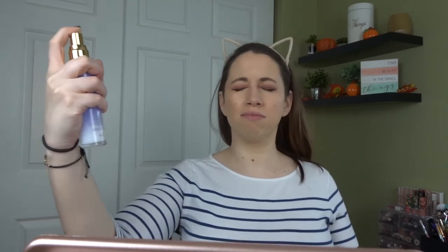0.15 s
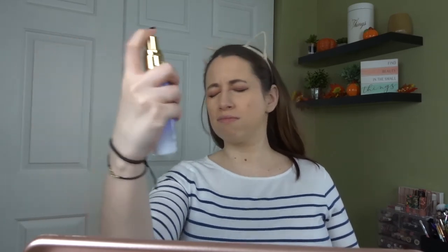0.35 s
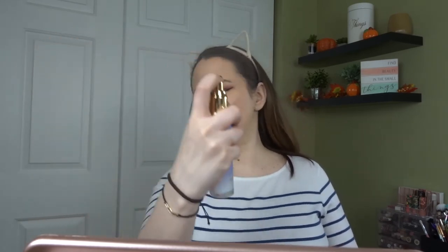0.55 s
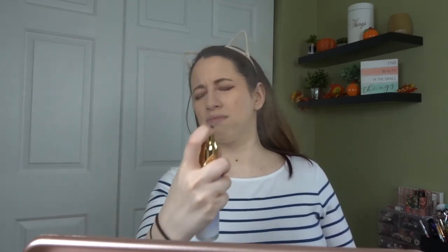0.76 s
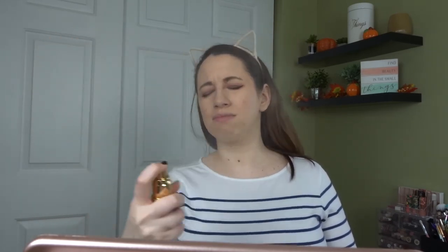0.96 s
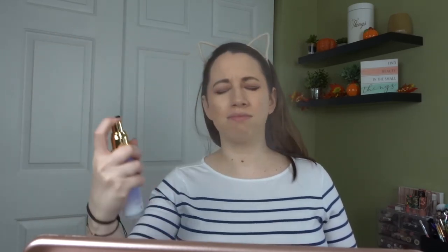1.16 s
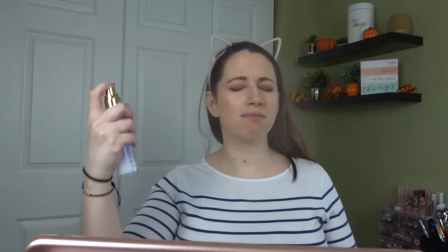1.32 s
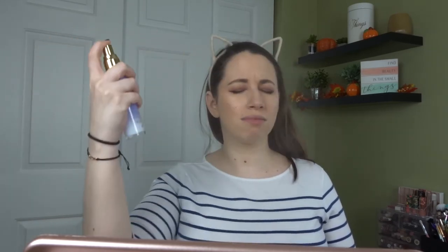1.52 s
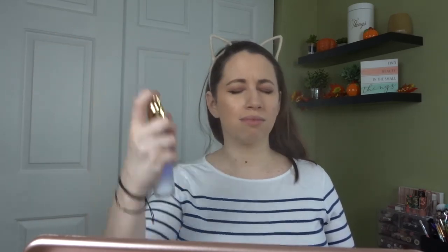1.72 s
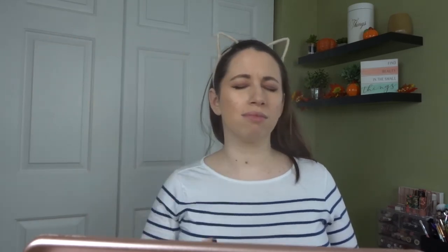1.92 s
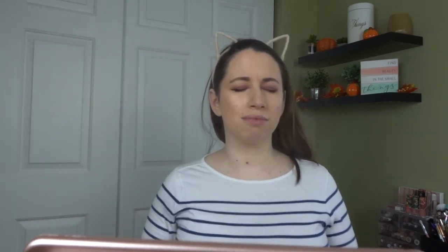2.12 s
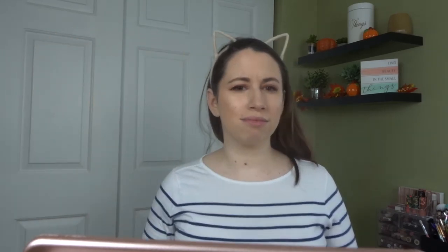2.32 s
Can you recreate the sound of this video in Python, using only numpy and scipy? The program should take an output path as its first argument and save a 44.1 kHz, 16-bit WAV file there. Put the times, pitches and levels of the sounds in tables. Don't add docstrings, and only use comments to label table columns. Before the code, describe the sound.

Hand pump spray bottle pressed repeatedly, short misty hisses with sharp plastic clacks, quiet room

```python
import sys
import numpy as np
from scipy import signal
from scipy.fft import rfft, irfft, next_fast_len
from scipy.io import wavfile
from scipy.ndimage import uniform_filter1d

SR = 44100
rng = np.random.default_rng(int(sys.argv[2]) if len(sys.argv) > 2 else 0)


def boost(x):
    u = np.asarray(x, float) / 20
    return 10 ** u


def digitize_waveform(pressure):
    field = np.atleast_2d(pressure).T
    bounded = np.clip(field, -1, 1)
    quanta = np.round(bounded * 32767).astype(np.int16)
    wavfile.write(sys.argv[1], SR, quanta)


N = 104958
PRE = 4410
LEFT_RIGHT = np.array([[1], [-1]])


def colour(x, points):
    p, n = np.array(points, float), next_fast_len(x.shape[-1])
    f_hz = np.arange(n // 2 + 1) * SR / n + 1
    gain_db = np.interp(np.log(f_hz), np.log(p[:, 0]), p[:, 1], left=p[0, 1] - 15)
    y = irfft(rfft(x, n) * boost(gain_db), n)[..., :x.shape[-1]]
    return y / np.sqrt(np.mean(y ** 2))


def high(x, hz, order=2):
    return signal.sosfilt(signal.butter(order, hz, "high", fs=SR, output="sos"), x)


def walk(rate_hz, n):
    k = int(SR / rate_hz)
    held = np.repeat(rng.standard_normal(n // k + 1), k)
    w = uniform_filter1d(uniform_filter1d(held, k), k)[:n]
    return w / w.std()


def ring(modes, t, phases):
    s = np.maximum(t, 0)
    total = 0
    for (hz, db, t60_s), phase in zip(modes, phases):
        total = total + boost(db - 60 * s / t60_s) * np.sin(2 * np.pi * hz * s + phase)
    return total * (t > 0)


PRESS_STARTS = [
    -.06,
    .2195,
    .462,
    .7038,
    .944,
    1.2112,
    1.6538,
]
# length_s, start_db, stop_db, fine_mist_db
PRESSES = [
    (0.03, -28.5, -54, 0.5),
    (0.031, -43, -35, 0.5),
    (0.034, -37.5, -35.5, -0.5),
    (0.067, -39, -36.5, -0.5),
    (0.068, -42, -38.5, 1),
    (0.054, -41, -39, -0.5),
    (0.035, -47, -40, 1),
]
# freq_hz, level_db
MIST_SPECTRUM = [(900, -19.5), (1600, -18), (2200, -6), (4000, -5.5), (5200, -7), (6300, -7), (8000, -10),
                 (10300, -13)]
MIST_ATTACK_S, MIST_RELEASE_T60_S = 0.00021, 0.12
DROPS_DB, SPUTTER_DB, FINE_HZ = 2.0, 1.5, 3500


def mist(t):
    n, press, fine = len(t), 0, 0
    for start_s, (length_s, start_db, stop_db, fine_db) in zip(PRESS_STARTS, PRESSES):
        end_s = start_s + length_s
        level_db = np.interp(t, [start_s, end_s], [start_db, stop_db])
        level_db = level_db - 60 * np.maximum(t - end_s, 0) / MIST_RELEASE_T60_S
        flow = boost(level_db) * np.clip((t - start_s) / MIST_ATTACK_S, 0, 1)
        press = press + flow
        fine = fine + flow * (boost(fine_db) - 1)
    droplets_db = DROPS_DB * rng.exponential(size=n) + SPUTTER_DB * walk(150, n)
    hiss = colour(rng.standard_normal((2, n)) * boost(droplets_db), MIST_SPECTRUM)
    return press * hiss + fine * high(hiss, FINE_HZ, order=1)


# time_s, peak_db, bright_db_per_octave
STOPS = [
    (-.012, -15, 2),
    (0.2507, -14.5, -1.5),
    (0.4945, -11, 2),
    (0.7647, -9, 3),
    (1.0053, -7, 5.5),
    (1.2548, -13.5, 6),
    (1.6924, -15, 0.5),
]
# freq_hz, level_db, t60_s
CLACK_MODES = [(2930, -0.5, 0.0027), (3910, -0.5, 0.0037), (4930, -12, 0.0016), (6800, -2, 0.0023),
               (7700, -14, 0.0015), (9140, -10, 0.0025)]
CLACK_SCATTER, TICK_SCATTER = 0.025, 0.025
SMALL_HZ = 1957


def plunger_clacks(t):
    out = np.zeros(len(t))
    for (time_s, peak_db, bright), c in zip(STOPS, rng.standard_normal((len(STOPS), 12))):
        first = int(time_s * SR) + PRE
        k = slice(first, first + 2000)
        modes = [(hz * (1 + CLACK_SCATTER * j), db + bright * np.log2(hz / 4000), t60_s)
                 for (hz, db, t60_s), j in zip(CLACK_MODES, c)]
        x = ring(modes, t[k] - time_s, 0.25 * c[6:])
        out[k] -= boost(peak_db) * x / np.abs(x).max()
    return high(out, SMALL_HZ, order=4)


# freq_hz, level_db
ROOM_COLOUR = [(1500, -0.5), (2300, -2.5), (3300, -5), (5500, -2), (6400, 5), (7400, -3.5), (8800, 0.5),
               (10500, -3)]
ROOM_DB, ROOM_LAG_S, ROOM_T60_LOW_S, ROOM_T60_HIGH_S = -1.5, 0.003, 0.42, 0.38
SAME_LOW, SAME_HIGH = 0.56, 0.037
LATE_DB, LATE_T60_S, LATE_TOP_HZ = -13.5, 1.31, 3130


def room(x):
    u = np.arange(SR) / SR
    noise = rng.standard_normal((3, len(u)))

    def mix(same):
        return np.sqrt(1 - same) * noise[:2] + np.sqrt(same) * noise[2]

    wash = mix(SAME_LOW) + high(mix(SAME_HIGH) - mix(SAME_LOW), 2500)
    top = high(wash, 2760)
    early = (wash - top) * boost(-2.0 - 60 * u / ROOM_T60_LOW_S) + top * boost(-60 * u / ROOM_T60_HIGH_S)
    dull = wash - high(wash, LATE_TOP_HZ, order=1)
    late = dull * boost(LATE_DB - 60 * u / LATE_T60_S)
    response = colour((early + late) * (u > ROOM_LAG_S), ROOM_COLOUR) / np.sqrt(len(u))
    return signal.fftconvolve(x[None], response, axes=1)[:, :len(x)] * boost(ROOM_DB)


# freq_hz, level_db
HUSH_SPECTRUM = [(25, -23), (60, -8.5), (200, -6.5), (700, -6), (1000, -7), (1300, -13), (2000, -10.5),
                 (10500, -26.5)]
# freq_hz, width_hz, level_db
HOLLOWS = [(428, 225, -12.5), (643, 112, -10)]
# time_s, level_db
HUSH_LEVEL = [(0, 1), (.8, 2.5), (1.5, 0), (2.0, 1.5), (2.38, -2)]
HUSH_DB = -63


def hush(t):
    n = len(t)
    pair = colour(rng.standard_normal((2, n)), HUSH_SPECTRUM)
    for hz, width_hz, db in HOLLOWS:
        peak = [(hz - width_hz, -20), (hz, 0), (hz + width_hz, -20), (2 * hz, -60)]
        tone = colour(rng.standard_normal((2, n)), peak)
        pair = pair + boost(db + 3.5 * walk(8.18, n)) * tone
    side = high(pair[1], 380, order=2) * boost(-5.0) + boost(-7) * pair[1]
    level_db = HUSH_DB + np.interp(t, *np.array(HUSH_LEVEL).T) + 0.5 * walk(5.81, n)
    return boost(level_db + 0.3 * LEFT_RIGHT) * (pair[0] + side * LEFT_RIGHT)


FAN_HZ, FAN_DB = 111.3, -75


def fan(t):
    n = len(t)
    pitch_hz = FAN_HZ * (1 + 0.0304 * walk(23.0, n))
    return boost(FAN_DB + 1.2 * walk(9.6, n)) * np.sin(2 * np.pi * np.cumsum(pitch_hz) / SR)


# start_s, length_s, level_db
SUCKS = [
    (0.117, 0.11, -56.5),
    (0.367, 0.038, -51),
    (0.606, 0.019, -50.5),
    (0.666, 0.0087, -43.5),
    (0.834, 0.048, -51.5),
    (1.084, 0.022, -50.5),
    (1.361, 0.053, -54),
    (1.93, 0.077, -61),
]
# freq_hz, level_db
SUCK_SPECTRUM = [(1300, -16), (2200, 1.5), (2900, -8.5), (5000, -13), (6300, -7), (7500, -11), (8900, -7),
                 (10500, -16.5)]
SUCK_RISE, SUCK_T60_S, GURGLE_DB = 0.33, 0.15, 3


def suck(t):
    n, flow = len(t), 0
    for start_s, length_s, db in SUCKS:
        fade_db = 60 * np.maximum(t - start_s - length_s, 0) / SUCK_T60_S
        flow = flow + boost(db - fade_db) * np.clip((t - start_s) / (SUCK_RISE * length_s), 0, 1)
    gurgle = rng.standard_normal((2, n)) * boost(GURGLE_DB * walk(200, n))
    return flow * colour(gurgle, SUCK_SPECTRUM)


# time_s, peak_db, cap_hz, cap_rel_db, bright_db_per_octave
TICKS = [(0.125, -27, 2470, -33, -11), (0.135, -28.5, 2450, -7.5, -8), (0.1529, -34, 2310, -8, 1),
         (0.194, -29, 2320, -3.5, -8), (0.37, -26, 2180, -16, -6.5), (0.3813, -22.5, 2250, -2, 1),
         (0.397, -42.5, 2360, 7, 3), (.438, -28, 2120, 4.5, -1), (0.6126, -30, 1840, -6.5, -7),
         (0.6226, -44, 2300, -20, 1), (.6265, -36.5, 2300, -13, 3), (0.6335, -39, 2110, 14.5, -13),
         (0.6423, -36, 2210, -8, 20), (0.67, -30, 2070, 5.5, -3), (.676, -45, 2120, 9, 1),
         (.747, -22.5, 3370, -8, -1), (0.8427, -28.5, 2140, -8, 3), (.8545, -31, 2250, -5.5, 4),
         (0.8713, -32, 2350, -5, 13), (.9125, -38.5, 2200, 3, -4), (0.9245, -41, 2350, 8, -3),
         (1.0908, -29.5, 1990, -9.5, 0), (1.1025, -36, 2300, -1, 9), (1.1197, -34.5, 2540, -5, 8),
         (1.173, -42.5, 2200, 7.5, 8), (1.3643, -31.5, 2010, -16, -9), (1.374, -32, 2070, -2, -4),
         (1.382, -38, 2070, -5, -16), (1.392, -29.5, 2620, -12.5, 12), (1.605, -51.5, 2030, 6, -8),
         (1.95, -46.5, 2430, 8.5, 1), (1.9565, -44, 2270, -1, 0), (1.9754, -35, 2700, -7.5, 6),
         (1.986, -40, 2540, -8, -1), (1.989, -43, 2470, -8, 8)]
# freq_hz, level_db, t60_s
TICK_MODES = [(2800, -11, 0.0011), (4040, -2, 0.0024), (6020, 1.5, 0.0062), (7200, -16, 0.0012),
              (8800, -6.5, 0.0027)]
CAP_DB, CAP_T60_S, CAP_AGAIN_S, CAP_AGAIN_DB = -4, 0.011, 0.011, -11
CAP_PAIR, CAP_PAIR_DB = 1.1, -3


def cap_ring(u, hz, db, phase):
    modes = [(hz, db + CAP_DB, CAP_T60_S), (hz * CAP_PAIR, db + CAP_DB + CAP_PAIR_DB, CAP_T60_S)]
    return ring(modes, u, [0, phase]) * np.clip(u / 0.000095, 0, 1)


def spring_ticks(t):
    out = np.zeros(len(t))
    for (time_s, peak_db, cap_hz, cap_db, bright), c in zip(TICKS, rng.standard_normal((len(TICKS), 10))):
        first = int(time_s * SR) + PRE
        k = slice(first, first + 4000)
        u = t[k] - time_s
        modes = [(hz * (1 + TICK_SCATTER * j), db + e + bright * np.log2(hz / 5000), t60_s)
                 for (hz, db, t60_s), j, e in zip(TICK_MODES, c, c[3:])]
        snap = ring(modes, u, 0.5 * c[:5])
        again_s = CAP_AGAIN_S * (1 + 0.1953 * c[7])
        cap = cap_ring(u, cap_hz, cap_db, c[5])
        cap_again = boost(CAP_AGAIN_DB + 2 * c[6]) * cap_ring(u - again_s, cap_hz, cap_db, c[5])
        out[k] += boost(peak_db) * (snap / np.abs(snap).max() + cap + cap_again)
    return high(out, SMALL_HZ, order=4)


# time_s, level_db
BUMPS = [
    (2.085, -52.5),
    (2.112, -51.5),
    (2.145, -56),
    (2.185, -60.5),
    (2.235, -60),
    (2.297, -60),
    (2.351, -64),
]
# freq_hz, level_db, t60_s
DESK_MODES = [(51, -12.5, 0.43), (115, 2, 0.29), (159, 3.5, 0.064), (213.4, -2.5, 0.48), (260, 0, 0.087),
              (328, 2, 0.21), (366, -5, 0.21), (500, -19, 0.14), (657, -12, 0.25)]
# freq_hz, level_db
SCUFF_SPECTRUM = [(150, 4), (350, 10.5), (700, 7), (1100, -22)]
BUMP_PUSH_S, SCUFF_DB, SCUFF_T60_S = 0.0028, -6.5, 0.3


def desk(t):
    out, k = np.zeros((2, len(t))), t > BUMPS[0][0]
    rough = rng.standard_normal(len(t)) + 0.61 * rng.standard_normal((2, len(t)))
    scuff = colour(rough, SCUFF_SPECTRUM)[:, k]
    for (time_s, level_db), c in zip(BUMPS, rng.standard_normal((len(BUMPS), len(DESK_MODES)))):
        u = t[k] - time_s
        modes = [(hz, db + 2 * e, t60_s) for (hz, db, t60_s), e in zip(DESK_MODES, c)]
        rub = scuff * boost(SCUFF_DB - 60 * np.maximum(u, 0) / SCUFF_T60_S)
        out[:, k] += boost(level_db) * (ring(modes, u, 0 * c) + rub) * np.clip(u / BUMP_PUSH_S, 0, 1)
    return out


SWAY_HZ, SWAY_DB, SWAY_RISE_S, SWAY_END_S = 23.4, -57, 0.085, 2.25


def sway(t):
    grow = np.clip((t - BUMPS[0][0]) / SWAY_RISE_S, 0, 1) ** 0.88
    level_db = SWAY_DB - 160 * np.maximum(t - SWAY_END_S, 0)
    return boost(level_db) * grow * np.sin(2 * np.pi * SWAY_HZ * t)


# time_s, left_minus_right_db, to_walls_db
BOTTLE_PLACE = [(0, 5.5, 0.5), (.4, 2.5, -2.5), (.68, 1, -2.5), (1.0, 2.5, -2.5), (1.25, 4.5, -1),
                (1.4, 4.5, -8.5), (1.7, 2, 1), (1.881, 2.5, -2), (1.95, 3, 2)]
WIDE_DB, WIDE_HZ, TICK_WET_DB, WET_TILT_DB = -2.5, 3800, -5, 0.8


def scene():
    t = (np.arange(N + PRE) - PRE) / SR
    mid, side = mist(t) + suck(t)
    side = boost(WIDE_DB) * high(side, WIDE_HZ, order=3)
    clacks, ticks = plunger_clacks(t), spring_ticks(t)
    bottle = mid + clacks + ticks
    time_s, pan_db, wet_db = np.array(BOTTLE_PLACE).T
    pan = np.interp(t, time_s, pan_db)
    near = np.array([(bottle + side) * boost(pan / 2), (bottle - side) * boost(-pan / 2)])
    sent = (mid + clacks + boost(TICK_WET_DB) * ticks) * boost(np.interp(t, time_s, wet_db))
    place = np.searchsorted(PRESS_STARTS[1:], t)
    wet = sum(room(sent * (place == k)) for k in range(len(PRESS_STARTS)))
    wet = wet * boost(WET_TILT_DB * LEFT_RIGHT)
    return (near + wet + hush(t) + fan(t) + desk(t) + sway(t))[:, PRE:]


def top_cut(x):
    return signal.sosfilt(signal.butter(12, 12260, fs=SR, output="sos"), x)


def record(dry):
    mix = signal.sosfilt(signal.ellip(10, 0.2, 82, 10900, fs=SR, output="sos"), dry)
    return top_cut(mix)


dry = scene()
out = record(dry)
digitize_waveform(out)
```